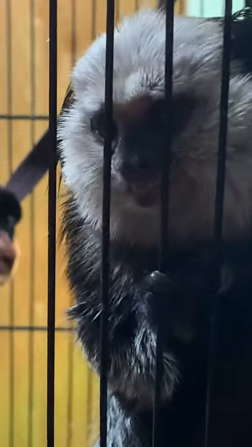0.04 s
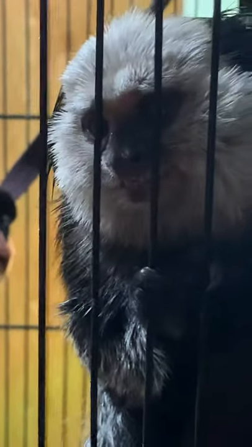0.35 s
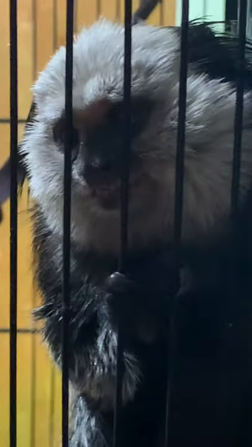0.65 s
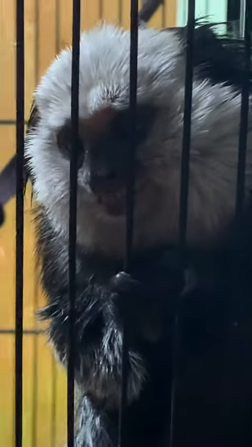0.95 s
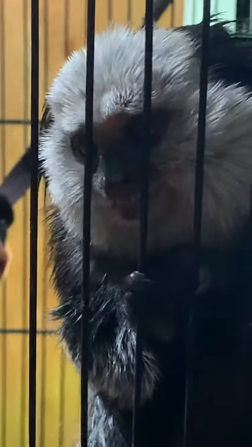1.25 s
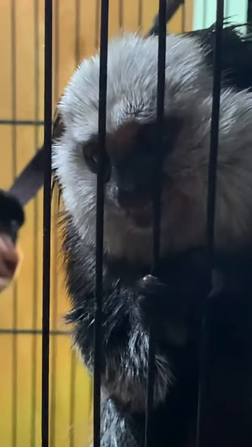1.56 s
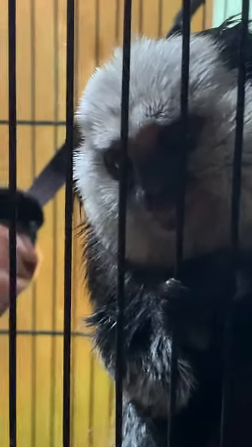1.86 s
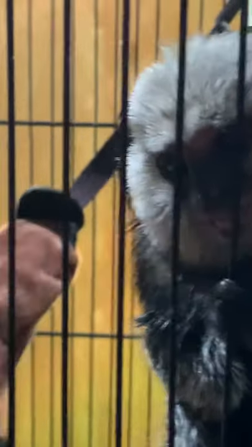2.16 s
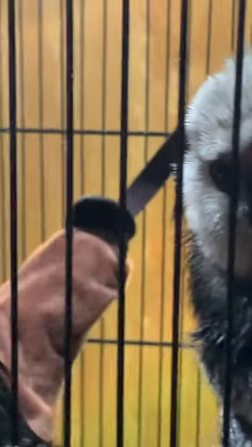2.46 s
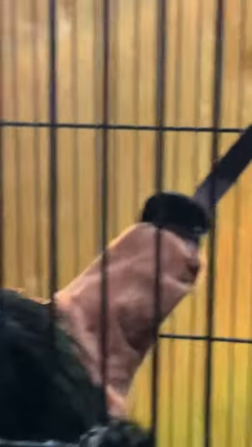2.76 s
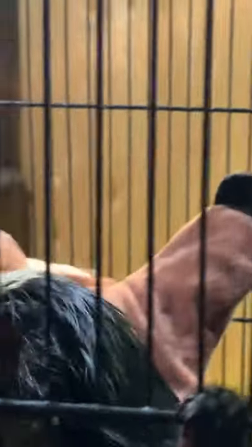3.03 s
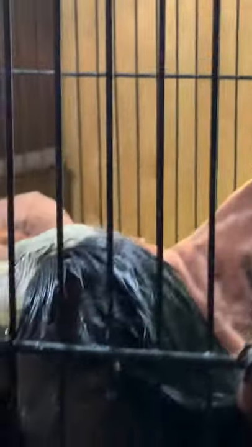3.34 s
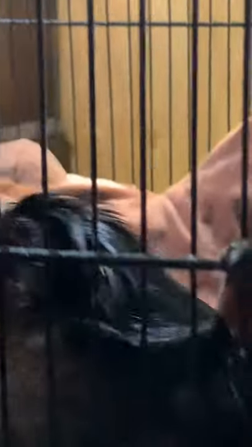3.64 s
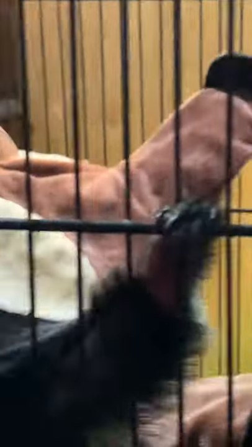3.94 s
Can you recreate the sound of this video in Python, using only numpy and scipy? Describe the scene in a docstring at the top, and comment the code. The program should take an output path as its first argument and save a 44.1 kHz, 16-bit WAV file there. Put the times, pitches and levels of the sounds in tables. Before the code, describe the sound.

A marmoset gives very high whistles and short trills close by in a wire cage, one falling whistle breaking into a rasp. Sharp snaps sound further off, twice early and once at the end, over faint fan hum.

```python
"""A marmoset calls close by from a wire cage in a small, live room. Its nearly pure voice, modulated in
frequency, gives wavering whistles near 7.5 kHz, two short trills and a falling whistle that breaks
into a rasp of uneven pulses filtered by the throat. Further off, three sharp snaps excite ringing
modes and echoes. A few ticks, soft rustles, a scuff and one dull bump sound over the hum of a fan."""
import sys
import numpy as np
from scipy import signal
from scipy.fft import rfft, irfft
from scipy.io import wavfile
from scipy.ndimage import uniform_filter1d

SR = 44100
rng = np.random.default_rng(int(sys.argv[2]) if len(sys.argv) > 2 else 0)


def bounce(signal):
    """Save signal as a 16-bit WAV file at the path given by the first command-line argument."""
    frames = np.transpose(np.atleast_2d(signal))
    limited = np.clip(frames, -1, 1)
    pcm = np.round(limited * 32767).astype(np.int16)
    wavfile.write(sys.argv[1], SR, pcm)


N = 176400
T = np.arange(N) / SR
FREQS = np.maximum(np.arange(N // 2 + 1) * SR / N, 1)
ROOM_T60_S, ROOM_GAP_S = 0.21, 0.0024

# The fan's motor tones. Each row: frequency in Hz, level in dB.
MOTOR_TONES = [(49.5, -69), (67.7, -70), (169.3, -64.5), (338.6, -57.5), (406.2, -57.5), (473.9, -59.5)]
# Spectra of the fan's rumble and rush of air. Each row: frequency in Hz, relative level in dB.
RUMBLE_SPECTRUM = [(15, -36.5), (28, -28), (40, -12), (50, -5), (64, -3.5), (80, -13.5), (105, -11),
                   (135, -12.5), (175, -9), (215, -7.5), (260, -7.5), (310, -7.5), (370, -8), (440, -3),
                   (500, -9), (650, -30)]
AIR_SPECTRUM = [(300, -17.5), (500, -0.5), (700, -0.5), (1000, -5.5), (1600, -8), (2500, -16),
                (4000, -17.5), (5300, -21), (6500, -30), (10000, -36), (15000, -40)]
# Light contacts on the cage. Each row: start in seconds, strength in dB.
TICK_HITS = [(.061, -56), (0.795, -52), (1.4313, -31), (1.4647, -37), (1.877, -50), (2.2983, -45)]
# Their spectrum. Each row: frequency in Hz, gain in dB.
TICK_SPECTRUM = [(1000, -7), (3000, -1), (6000, -3), (9000, -1), (12000, -2), (15000, 5), (16000, -1)]
# Contours of the unbroken calls. Each row: time in seconds, pitch in Hz, level in dB.
WAVERING_WHISTLE = [(0.136, 8370, -34.5), (0.152, 7700, -40), (0.16, 7640, -32), (0.173, 7970, -38),
                    (0.188, 7900, -41.5), (0.195, 7590, -34), (0.212, 7200, -37), (0.231, 7600, -36.5),
                    (0.238, 7640, -36.5), (0.26, 7220, -41), (0.269, 7290, -35), (0.281, 7000, -35),
                    (0.293, 6210, -37)]
LOUD_TRILL = [(.993, 8150, -35), (1.006, 8750, -44), (1.012, 8650, -41), (1.018, 8150, -33.5),
              (1.031, 7720, -34.5), (1.044, 8200, -34), (1.052, 8750, -38), (1.058, 8800, -48),
              (1.067, 8200, -34.5), (1.074, 7750, -38), (1.083, 7570, -32.5), (1.093, 7750, -37.5),
              (1.106, 8250, -39)]
FALLING_WHISTLE = [(1.891, 8150, -37), (1.897, 7500, -38), (1.914, 7130, -34.5), (1.925, 6620, -44.5),
                   (1.946, 6140, -43), (1.956, 6090, -36), (1.975, 5955, -35), (1.981, 6350, -33)]
WHISTLE_AFTER_RASP = [(2.171, 6830, -64), (2.175, 6440, -43), (2.189, 5880, -48)]
LONG_WHISTLE = [(3.322, 7840, -39.5), (3.337, 8010, -37), (3.349, 7680, -32.5), (3.37, 7500, -33),
                (3.373, 7490, -32.5), (3.398, 7480, -33), (3.413, 7310, -29), (3.437, 7270, -32),
                (3.451, 7470, -35.5), (3.472, 6920, -33.5), (3.474, 6490, -43.5)]
# Separate trill notes, each a dip in pitch. Each row: start, end and time of lowest pitch in seconds,
# lowest pitch in Hz, swing in Hz, swings per second, level at the lowest pitch in dB.
TRILL_NOTES = [(.717, 0.733, .716, 7040, 478, 25, -44), (0.75, 0.77, .754, 7100, 500, 28, -42),
               (0.786, 0.811, .797, 6950, 504, 34, -39.5), (0.812, .848, .832, 6940, 510, 23, -38),
               (1.844, 1.879, 1.851, 8065, 622, 20, -36.5)]
# Contacts in quick runs, one run to a snap. Each row: start in seconds, strength in dB,
# gain below 3.5 kHz in dB, gain above 10 kHz in dB.
SNAP_HITS = [(0.3536, -17.5, -9, -1), (0.3588, -13.5, -3.5, -4), (0.3612, -17, 7.5, -2),
             (.3652, -29, 14, 6), (0.5865, -15, -1, -5.5), (0.5884, -10, -2.5, -9), (0.5892, -10.5, -3, -7),
             (0.5912, -18, 8, -9), (.5985, -16, -7, 3), (.6028, -14, -4, -2), (3.8375, -18, -7.5, 4),
             (3.8403, -11.5, -1.5, 2), (3.843, -9, -7.5, -3), (3.8467, -18.5, -1, 3.5),
             (3.85, -15, -6, 6.5)]
# Spectra of the snaps and of their reflections. Each row: frequency in Hz, gain in dB.
SNAP_SPECTRUM = [(200, -23), (500, -0.5), (700, -4.5), (1000, -2), (1500, -5.5), (2300, 0.5), (3000, -9),
                 (3700, -1), (4800, -1), (6000, 3), (7000, 6.5), (8100, 7), (9000, 0), (10300, 0.5),
                 (11800, -7.5), (13200, -8), (14500, -8), (16000, -23)]
REFLECTION_SPECTRUM = [(500, 2), (4500, -1), (6500, -1), (8200, 2.5), (10000, 1), (12000, -0.5), (14500, 1)]
# Modes the snaps excite. Each row: frequency in Hz, relative level in dB, 60 dB decay time in seconds.
SNAP_RESONANCES = [(530, -10, 0.094), (1435, -13, 0.051), (2222, -13, 0.076), (6016, -9, .17),
                   (6620, -8, 0.28), (6780, -5, 0.22), (6920, -1, 0.19), (7300, -9, 0.18), (7700, -5, .2),
                   (8100, 0, 0.19), (10080, -4, .1), (10360, -2, 0.14), (12200, -4, 0.167),
                   (14400, -12, .14)]
# Echoes of the snaps off nearby surfaces. Each row: delay in seconds, gain in dB.
EARLY_ECHOES = [(.0098, -10.5), (0.0141, -12), (.0275, -23)]
# Soft rustles. Each row: time of the peak in seconds, level in dB.
RUSTLE_PEAKS = [(.84, -57), (2.426, -66), (2.458, -61), (2.955, -57.5), (3.513, -63), (3.792, -68)]
# Their spectrum. Each row: frequency in Hz, relative level in dB.
RUSTLE_SPECTRUM = [(1000, -15.5), (2500, 2.5), (7000, 1.5), (9000, -8.5), (12000, -6), (15000, -12)]
# The rasp's pulse train. Each row: time in seconds, pulse rate in Hz, level in dB.
RASP_CONTOUR = [(1.98, 806.5, -39), (1.993, 809.8, -36), (2.009, 804.8, -33.5), (2.024, 792.8, -38.5),
                (2.038, 794.7, -37), (2.047, 798.4, -35.5), (2.064, 805.4, -37.5), (2.10, 797, -38),
                (2.125, 803.4, -37), (2.165, 797.6, -38), (2.177, 797, -54)]
# Break-up of the voice, greatest at both ends. Each row: time in seconds, roughness (0 is regular).
RASP_ROUGHNESS = [(1.98, 1.2), (1.998, 0.44), (2.012, 0), (2.024, 0.1), (2.038, 0.55), (2.047, .25),
                  (2.075, 0.44), (2.125, 0.6), (2.155, 0.3), (2.171, 1.1)]
# Response of throat and mouth, and the rasp's hiss. Each row: frequency in Hz, relative level in dB.
VOCAL_TRACT = [(500, -48.5), (800, -11.5), (1150, -9.5), (1600, -11), (2050, -6), (2420, -9.5), (2900, -32),
               (3300, -23.5), (4000, -19), (4800, -7), (5640, 1), (6440, 0.5), (7240, 0), (8050, -15),
               (9500, -76), (11200, -62), (12300, -23), (13300, -40), (14400, -38), (16000, -69)]
HISS_SPECTRUM = [(600, -28), (1200, 1), (1900, -1.5), (2900, -8.5), (4200, 2), (6000, 2), (9000, -30),
                 (16000, -43.5)]
# The whistle inside the rasp. Each row: time in seconds, pitch in Hz, level in dB.
SQUEAL_CONTOUR = [(1.98, 6145, -42), (1.989, 6535, -37), (2.008, 6403, -40), (2.021, 6226, -46),
                  (2.04, 6153, -44), (2.055, 6430, -37), (2.076, 6360, -40.5), (2.102, 6610, -36),
                  (2.125, 6500, -46), (2.168, 6380, -43.5)]
# Spectrum of the scuff. Each row: frequency in Hz, relative level in dB.
SCUFF_SPECTRUM = [(700, -25), (1500, 6), (2400, -1), (4000, -29)]
# Modes of a thin wire. Each row: frequency in Hz, gain in dB, 60 dB decay time in seconds.
WIRE_MODES = [(4350, -22, .09), (4560, -20, .09)]
# Likeness of diffuse sound in the two channels. Each row: frequency in Hz, coherence from 0 to 1.
COHERENCE = [(50, 0.96), (150, 0.91), (400, 0.77), (700, 0.32), (2500, 0.61), (4500, 1), (8000, 1),
             (15000, 0.87)]
# Phase between the two channels. Each row: frequency in Hz, lead of the left in radians.
LEFT_LEAD = [(10, 0), (300, -.5), (900, -2.4), (1500, -.6), (2300, 1.7), (3400, 1.5), (4700, 3.2),
             (6880, 6.28), (8900, 9.4), (15200, 18.85)]
# Balance between the two channels. Each row: frequency in Hz, left minus right in dB.
LEFT_BALANCE = [(1600, -0.5), (2400, -1.5), (3400, 0), (5000, 0)]


def from_db(db):
    """Amplitude grows tenfold for every 20 dB."""
    return 10 ** (np.asarray(db) / 20)


def rms_one(x):
    """Division by the RMS value gives unit power."""
    return x / np.sqrt(np.mean(x ** 2) + 1e-20)


def in_time(rows):
    """Linear interpolation gives each column of a contour at every sample."""
    times, *columns = np.transpose(rows)
    return [np.interp(T, times, column) for column in columns]


def at_hz(points):
    """Interpolation on a logarithmic axis gives a table's value at every frequency."""
    hz, value = np.transpose(points)
    return np.interp(np.log(FREQS), np.log(hz), value)


def colour(x, spectrum):
    """Minimum-phase filtering: folding the cepstrum makes a dB spectrum into a causal response."""
    cepstrum = irfft(np.log(from_db(at_hz(spectrum))), N)
    cepstrum[1:N // 2] *= 2
    cepstrum[N // 2 + 1:] = 0
    return irfft(rfft(x) * np.exp(rfft(cepstrum)), N)


def drift(corner_hz):
    """Low-passed noise is a smooth random fluctuation, here of unit power."""
    return rms_one(irfft(rfft(rng.standard_normal(N)) / (1 + (FREQS / corner_hz) ** 2), N))


def gate(start, end, attack_s=0.0057, release_s=0.0021):
    """A trapezoidal envelope turns the voice on and off."""
    return np.clip((T - start) / attack_s + .5, 0, 1) * np.clip((end - T) / release_s + .5, 0, 1)


def diffuse():
    """A diffuse field is partly coherent at two points: white noise, partly alike in both channels."""
    coherence = np.clip(at_hz(COHERENCE), 0, .99)
    mid, side = rfft(rng.standard_normal((2, N)))
    return rms_one(irfft(np.sqrt(1 + coherence) * mid + np.sqrt(1 - coherence) * side * [[1], [-1]], N))


def room(x, t60, gap_s, clumping_db=0):
    """Reverberation is convolution with dense reflections that decay, smoothly or in clumps."""
    tail = (diffuse() * from_db(clumping_db * drift(250) - 60 * T / t60) * (T > gap_s))[:, :SR // 2]
    tail /= np.sqrt(np.sum(tail ** 2) / 2)
    return signal.fftconvolve(x[None], tail, axes=1)[:, :N]


def contact(start, db, t60):
    """A hard impact is an impulse and a brief, dense crack; db sets their joint energy."""
    age = np.arange(SR // 50) / SR
    crack = rng.uniform(-0.95, 1, len(age)) * from_db(-60 * age / t60)
    impact = (age == 0) + from_db(-1) * crack / np.linalg.norm(crack)
    return np.pad(from_db(db) * impact / np.linalg.norm(impact), (int(start * SR), N))[:N]


def mode(x, hz, t60):
    """A damped resonator answers a unit impulse with a decaying sinusoid of unit energy."""
    radius, angle = from_db(-60 / (t60 * SR)), 2 * np.pi * hz / SR
    gain = np.sin(angle) * np.sqrt(2 * (1 - radius ** 2))
    return signal.lfilter([0, gain], [1, -2 * radius * np.cos(angle), radius ** 2], x + 1e-18)


def fan():
    """Fan noise is tonal plus broadband: wavering motor tones over a rumble and a rush of air."""
    hum = np.zeros(N)
    for hz, db in MOTOR_TONES:
        amplitude = np.sqrt(2) * from_db(db + 2.5 * drift(8.4))
        hum += amplitude * np.sin(2 * np.pi * hz * T + 0.52 * drift(2.3))
    rumble = rms_one(colour(diffuse(), list(RUMBLE_SPECTRUM) + [(900, -50.0), (3000, -77.5)]))
    air = rms_one(colour(diffuse(), AIR_SPECTRUM))
    return hum + from_db(-53.5) * rumble + from_db(-57) * air


def ticks():
    """Tiny contacts on the cage are so brief that their spectrum is broad."""
    return colour(sum(contact(start, db, t60=0.0033) for start, db in TICK_HITS), TICK_SPECTRUM)


def whistles(jitter=.003, shimmer_db=0.78, flutter_hz=254, crest_loss_db=9):
    """Frequency and amplitude modulation of one nearly pure voice give whistles and trills."""
    calls = (WAVERING_WHISTLE, LOUD_TRILL, FALLING_WHISTLE, WHISTLE_AFTER_RASP, LONG_WHISTLE)
    notes = [(*in_time(call), gate(call[0][0], call[-1][0])) for call in calls]
    for start, end, lowest_s, hz, swing, rate, db in TRILL_NOTES:
        crest = np.sin(np.pi * rate * (T - lowest_s)) ** 2
        notes.append((hz + swing * crest, db - crest_loss_db * crest, gate(start, end)))
    pitch, gain = np.full(N, LONG_WHISTLE[0][1], float), np.zeros(N)
    for hz, db, voiced in notes:
        pitch = np.where(voiced > 0, hz, pitch)
        gain = np.maximum(gain, voiced * from_db(db))
    phase = 2 * np.pi * np.cumsum(pitch * (1 + jitter * drift(flutter_hz))) / SR
    octave = from_db(-19 - 45 * np.maximum(pitch - 6180, 0) / 1000)   # heard only on low notes
    shimmer = from_db(-shimmer_db * drift(flutter_hz))
    return np.sqrt(2) * gain * shimmer * (np.sin(phase) + octave * np.sin(2 * phase))


def snaps():
    """Runs of hard impacts excite damped modes and reflect off nearby surfaces and the room."""
    hits = np.zeros(N)
    for start, db, body_db, treble_db in SNAP_HITS:
        tilt = [(3500, body_db), (6000, 0), (8000, 0), (10000, treble_db)]
        hits += colour(contact(start, db, t60=0.0038), tilt)
    direct = colour(hits, SNAP_SPECTRUM)
    ringing = sum(from_db(db) * mode(hits, hz, t60) for hz, db, t60 in SNAP_RESONANCES)
    ringing = from_db(-2) * np.std(direct) * rms_one(ringing)
    echoes = sum(from_db(db) * np.pad(direct, (int(delay * SR), 0))[:N] for delay, db in EARLY_ECHOES)
    scatter = from_db(-1.5) * room(direct, t60=0.056, gap_s=0.00033, clumping_db=4)
    tail = from_db(2.5) * room(direct, ROOM_T60_S, ROOM_GAP_S, clumping_db=4)
    return direct + ringing + colour(echoes + scatter + tail, REFLECTION_SPECTRUM)


def rustles(rise_s=0.0089, fall_s=0.041):
    """Soft brushing makes friction noise that swells quickly and decays exponentially."""
    envelope = sum(from_db(db) * np.exp(-np.maximum((peak - T) / rise_s, (T - peak) / fall_s))
                   for peak, db in RUSTLE_PEAKS)
    return envelope * rms_one(colour(diffuse(), RUSTLE_SPECTRUM)) * from_db(2 * drift(150))


def rasp(jitter_cycles=.028, shimmer_db=5):
    """Source and filter: uneven pulses and puffs of air excite the throat, beside a squeal and hiss."""
    pulse_hz, db = in_time(RASP_CONTOUR)
    roughness, = in_time(RASP_ROUGHNESS)
    cycles = np.cumsum(pulse_hz) / SR + jitter_cycles * roughness * drift(300)
    pulses = rms_one(sum(np.cos(2 * np.pi * k * cycles) for k in range(1, 19)))
    puffs = rms_one(rng.standard_normal(N) * (1 + np.cos(2 * np.pi * cycles)))
    shimmer = from_db(shimmer_db * roughness * np.minimum(drift(450), 1))
    voice = colour(pulses * shimmer + 0.93 * roughness * puffs, VOCAL_TRACT)
    voice /= np.sqrt(uniform_filter1d(voice ** 2, size=400) + 1e-12)   # unit power over each 9 ms
    hiss = from_db(-49.5) * roughness ** 2 * rms_one(colour(puffs, HISS_SPECTRUM))
    return (voice * from_db(db) + squeal(cycles) + hiss) * gate(RASP_CONTOUR[0][0], RASP_CONTOUR[-1][0])


def squeal(rasp_cycles, jitter=.016, chop_depth=1.1):
    """Amplitude modulation by the rasp's pulses gives an unsteady whistle sidebands."""
    hz, db = in_time(SQUEAL_CONTOUR)
    phase = 2 * np.pi * np.cumsum(hz * (1 + jitter * drift(340))) / SR
    tone = np.sin(phase) + from_db(-29) * np.sin(2 * phase)
    return from_db(db) * rms_one(tone * (1 + chop_depth * np.cos(2 * np.pi * rasp_cycles)))


def wire_ring(hz=2440, width_hz=35, start_s=2.17, rise_s=0.059, release_s=2.28, t60=0.75):
    """Narrow-band noise is heard as a wavering tone: a faint ring of wire lingers after the rasp."""
    phase = 2 * np.pi * hz * T
    tone = rms_one(drift(width_hz) * np.cos(phase) + drift(width_hz) * np.sin(phase))
    onset = np.clip((T - start_s) / rise_s, 0, 1)
    return tone * onset * from_db(-59.5 - 60 * np.maximum(T - release_s, 0) / t60)


def scuff(peak_s=2.2, width_s=0.015):
    """A short burst of friction noise with little treble is heard as a faint, dull scuff."""
    envelope = from_db(-55.5) * np.exp(-np.abs(T - peak_s) / width_s)
    return envelope * rms_one(colour(diffuse(), SCUFF_SPECTRUM))


def bump(ring_s=3.105, ring_hz=611, thud_s=3.108, end_hz=50, sag_hz=111, sag_s=0.0092):
    """A short hollow ring leads into a damped oscillation, a deep thud whose pitch sags."""
    hollow = from_db(-45) * np.exp(-((T - ring_s) / 0.0047) ** 2) * np.sin(2 * np.pi * ring_hz * T)
    age = np.maximum(T - thud_s, 0)
    phase = 2 * np.pi * (end_hz * age + sag_hz * sag_s * (1 - np.exp(-age / sag_s)))
    envelope = from_db(-44) * np.minimum(age / 0.0038, 1) * np.exp(-age / .03)
    return (hollow + envelope * np.sin(phase)) * from_db([[3], [-3]])   # toward the left


def wire_ping():
    """Free vibration: struck at the last snap, a thin wire rings briefly in two close modes."""
    hit = contact(start=3.843, db=0, t60=.001)
    return sum(from_db(db) * mode(hit, hz, t60) for hz, db, t60 in WIRE_MODES)


def scene():
    """Superposition: the close voice and ticks, their reverberation and the other sounds add up."""
    near = whistles() + rasp() + ticks()
    reverberation = from_db(-14.5) * room(near, ROOM_T60_S, ROOM_GAP_S)
    return (near + reverberation + wire_ring() + snaps() + wire_ping()
            + rustles() + scuff() + bump() + fan())


def record(dry):
    """The recorder gives the two channels differing phase and level; a low-pass filter cuts above 15.9 kHz."""
    half_each_way = np.array([[.5], [-.5]])
    lead = np.interp(FREQS, *np.transpose(LEFT_LEAD))
    response = np.exp(1j * lead * half_each_way) * from_db(at_hz(LEFT_BALANCE) * half_each_way)
    pair = irfft(rfft(dry) * response, N)
    return signal.sosfilt(signal.ellip(10, .2, 80, 15900, fs=SR, output="sos"), pair)


dry = scene()
out = record(dry)
bounce(out)
```